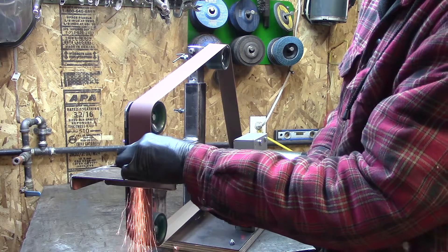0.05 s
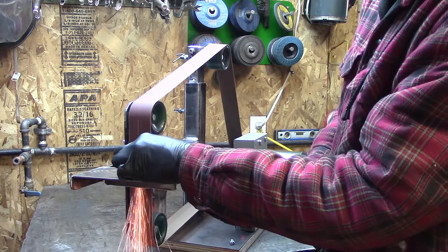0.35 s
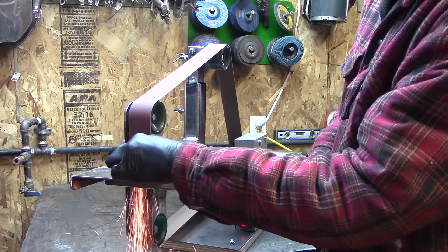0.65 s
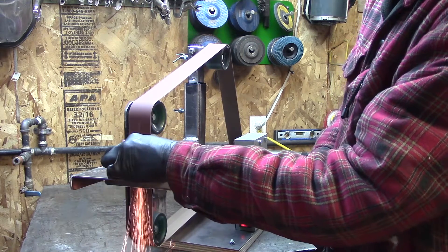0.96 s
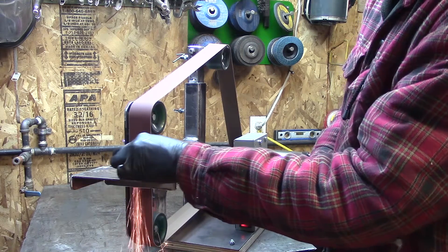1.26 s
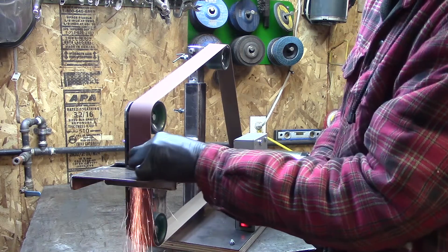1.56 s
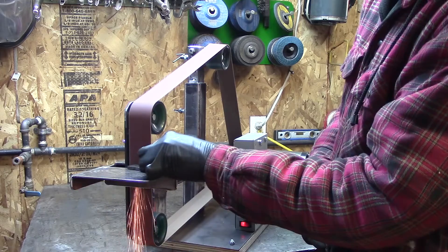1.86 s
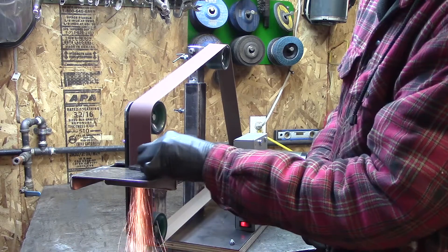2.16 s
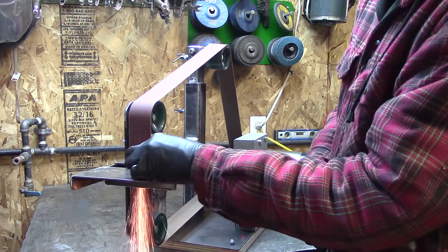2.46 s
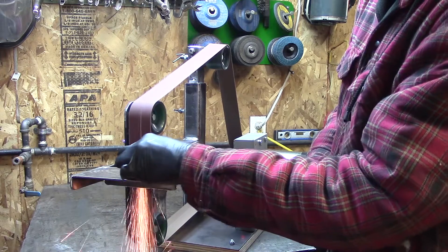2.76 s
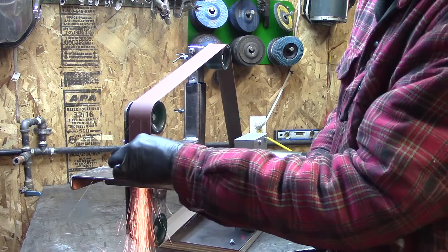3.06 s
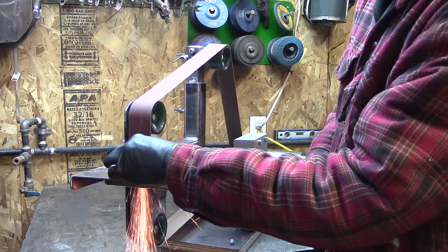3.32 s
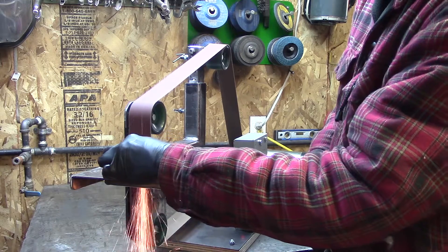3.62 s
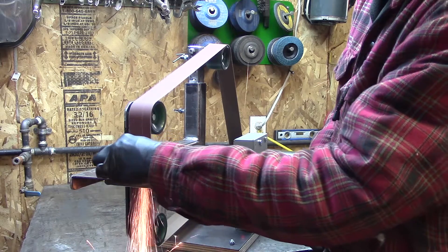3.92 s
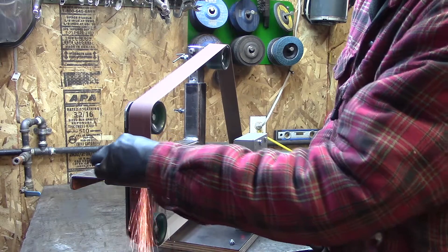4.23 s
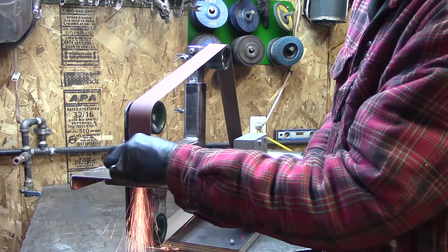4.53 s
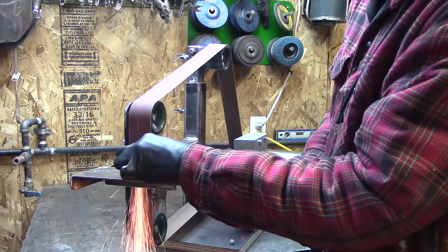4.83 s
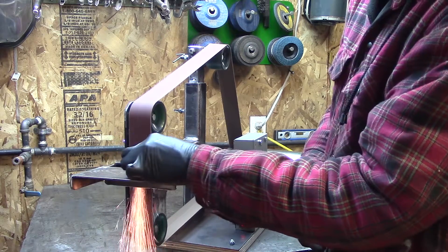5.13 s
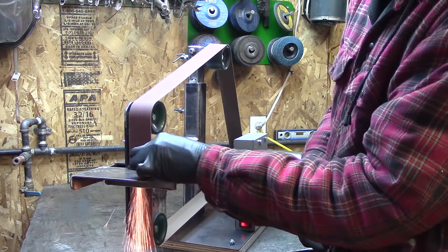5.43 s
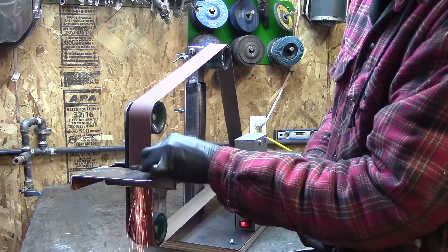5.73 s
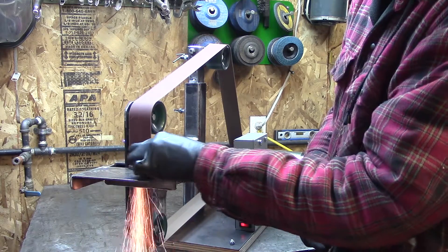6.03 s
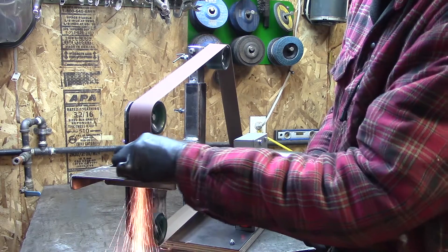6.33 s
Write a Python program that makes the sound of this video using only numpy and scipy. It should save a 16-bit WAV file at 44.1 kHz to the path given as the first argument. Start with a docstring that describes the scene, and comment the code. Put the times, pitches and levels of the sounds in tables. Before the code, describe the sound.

A belt grinder is already working on a piece of steel, heard close up in a small wood-lined workshop with little echo. The sound is a continuous bright rasp and hiss, pulsing slightly about twelve times a second, with thin metallic rings that swell and fade. A faint motor hum and the rush and drumming of the belt lie underneath. From about 1 to 2 seconds the grinding is a little lighter. At 2.1 seconds the steel digs in with a short, coarse scrape, starting a louder pass with a steadier high ring. Small fluttering chirps come as the belt catches between about 3.7 and 5.2 seconds. Around 5.5 seconds the pressure eases and a soft whine shows through. At 5.8 seconds the steel digs in again with more chirps, and the grinding carries on, swelling right at the end, near 6.6 seconds.

```python
"""Steel pressed against a belt grinder, heard close up on one microphone in a small wood-lined workshop.
The belt comes round about twelve times a second: its grit scrapes the steel and rings the platen and
tool rest, and the splice bumps by once a lap. Each push of the hand swells the rasp and makes the
wheels drone and sag a little. Behind it all sits the mains hum of the motor."""
import sys
import numpy as np
from scipy import signal
from scipy.fft import rfft, irfft, next_fast_len
from scipy.io import wavfile
from scipy.ndimage import uniform_filter1d

SR = 44100
rng = np.random.default_rng(int(sys.argv[2]) if len(sys.argv) > 2 else 0)


def wav_out(sig):
    """Save sig, one row per channel (or a flat mono array), as 16-bit PCM at SR to the path in sys.argv[1]."""
    wavfile.write(sys.argv[1], SR, np.round(np.clip(np.atleast_2d(sig).T, -1, 1) * 32767).astype(np.int16))


N = 290178
TIME = np.arange(N) / SR

TURNS_PER_S, TURNS_PER_LAP = 99.98, 8.112   # free speed of the small wheels; their turns per belt lap
# how each sound answers the hand: base gain/dB, dB per dB of pressure, dB per dB of bite
RASP_LAW, STEEL_LAW, SCRAPE_LAW = (-26.5, 0.37, .1), (-29, 0.95, -0.2), (-22, 0.16, 0.03)
RING_LAW, HISS_LAW, DRONE_LAW = (-26, 0.13, 0.15), (-22, .02, 0.2), (-46.5, 0, 0.67)

# pressure of the steel on the belt, lighter between passes: t/s, level/dB
HAND_PRESSURE = [(0, 1.1), (0.07, 1.5), (0.2, -1.6), (0.6, 0.03), (0.95, -2.0), (1.02, -6.0), (1.3, -2),
                 (2.05, -4.5), (2.12, 3), (3.8, 2), (4.15, 0.05), (4.6, -0.75), (4.73, 1.85), (5.25, 2),
                 (5.5, -4), (5.78, -3), (5.84, 2.5), (6.5, 0.5), (6.58, 8)]
# the hand nudges the steel in or eases it off: t/s, half length/s, level/dB
HAND_NUDGES = [(0.923, .03, 1), (1.04, .05, -1.5), (1.693, .05, -0.9), (2.06, .02, -1), (4.168, .02, -1.8),
               (5.61, .03, -.8), (4.86, 0.017, .6)]
# spells in which the belt catches on the steel: start/s, length/s, surge/dB, chirp/dB
BELT_CATCHES = [(1.3, .25, 0.5, -33), (3.743, .4, 1.5, -34), (4.218, .08, 3, -28), (4.863, .4, 2.5, -34),
                (5.842, .4, 1.5, -26.5)]
# the steel digs in at the start of a pass: start/s, length/s, level/dB
EDGE_DIGS = [(2.085, 0.24, -28), (5.79, 0.26, -30.5)]
# resonances that sing up as the contact slides: t/s, half length/s, f/Hz, width/Hz, level/dB
SINGING_MODES = [(0.12, .3, 4352, 18, -30), (0.15, .3, 4452, 18, -33), (0.4, .6, 2272, 44, -37),
                 (0.6, .14, 4452, 24, -29.5), (0.75, .3, 4352, 24, -33), (1.3, .04, 4445, 30, -29),
                 (1.48, .08, 4445, 24, -27), (2.18, .09, 4445, 30, -27.5), (2.36, .09, 4450, 30, -28.5),
                 (2.4, .16, 4685, 70, -29), (2.4, .25, 3740, 300, -30), (2.51, .035, 3740, 900, -24),
                 (3.3, .4, 4860, 130, -33), (3.3, .7, 1558, 30, -36.5), (3.5, .9, 2860, 70, -33),
                 (3.6, .7, 2615, 56, -35), (3.95, .06, 4780, 50, -30), (4.72, .05, 4690, 50, -27.5),
                 (4.75, .25, 4500, 50, -31), (5.0, .3, 1820, 34, -38.5), (5.1, .4, 1389, 18, -38),
                 (5.71, .04, 4450, 30, -29), (5.75, .25, 6135, 50, -36), (6.03, .06, 4450, 30, -26),
                 (6.18, .05, 4470, 50, -29), (6.4, .15, 4355, 24, -32)]

# resonances of the steel and the machine: f/Hz, width/Hz, relative level/dB
STEEL_MODES = [(1390, 30, -8), (1455, 45, -10), (1542, 35, -8), (1745, 35, -11), (1833, 40, -6),
               (1905, 30, -6), (2258, 28, -3), (2320, 35, -5), (2424, 24, -5)]
STEEL_MAIN_PAIR = [(2128, 38, 0), (2162, 40, -4)]   # the steel's strongest ring, two close modes
FRAME_MODES = [(2615, 50, -3), (2748, 30, -1), (2835, 35, -2), (3045, 50, -3), (3130, 45, -4),
               (3212, 45, -1), (3535, 35, -3), (3619, 26, 1.5), (3780, 35, -3), (3886, 28, -1)]   # platen and arm
TOOL_REST_MODES = [(4160, 30, -5), (4225, 30, -4), (4300, 22, -5), (4352, 20, 0), (4446, 20, 4),
                   (4495, 25, -5), (4580, 30, -5), (4678, 36, 1), (4780, 45, -2), (4925, 50, -5)]
STAND_MODES = [(300, 22, -4), (395, 25, -3), (505, 25, -7), (555, 30, -2), (660, 50, -3), (764, 20, -4),
               (1005, 45, -1), (1110, 24, 2), (1215, 26, 3), (1300, 30, 0)]
# narrow treble peaks that colour the grinding hiss: f/Hz, width/Hz, relative level/dB
HISS_PEAKS = [(5160, 35, -2), (5347, 45, -1), (5790, 50, 0), (6000, 55, -0.5), (6135, 38, 0.5),
              (6848, 70, -3), (7537, 40, -4), (8790, 60, -5), (9000, 80, -1), (9800, 55, -3),
              (9950, 55, -5), (10250, 160, -8), (11580, 200, -11), (13200, 70, -11), (14020, 80, -12)]

# broad spectra of the grit's noises: f/Hz, relative level/dB
RASP_SPECTRUM = [(200, -40), (500, -4.5), (1000, -3), (1400, -1), (1530, 0), (1640, -6), (1820, 3),
                 (1930, -2.5), (2030, -3.5), (2250, 1), (2450, -0.5), (3000, -7), (4000, -11), (7000, -50)]
SCRAPE_SPECTRUM = [(700, -62), (1500, -14.5), (2100, -13), (2600, -7), (3300, -4), (4000, -6), (4400, -5.5),
                   (5200, -18), (8000, -34)]
TOOL_REST_SPECTRUM = [(3000, -15), (3900, -11), (4250, 2), (4850, 6), (5200, -19), (6500, -26)]
HISS_SPECTRUM = [(3000, -14.5), (4800, 1), (5500, 3.5), (6500, 1.5), (7800, 0.5), (9000, -0.5),
                 (10300, -2.5), (12000, -5.5), (13800, -10), (15000, -25), (15700, -22)]
DIG_SPECTRUM = [(500, -36), (1000, 1.5), (1350, 0), (1800, 12), (2050, -8), (2600, -20), (5000, -45)]
BELT_RUSH_SPECTRUM = [(25, -39), (60, -29), (130, -25.5), (185, -26), (215, -9), (350, -14), (600, -10),
                      (700, -2), (860, -8.5), (1200, -0.5), (1700, -10.5), (3000, -15)]

# rise and fall of single sounds, apart from pressure: t/s, level/dB
SCRAPE_CURVE = [(0, 0), (1.9, -0.5), (2.5, 0.44), (3.5, -0.5), (4.2, -0.5), (4.9, 0), (5.5, -0.5),
                (6.58, 0.2)]
TOOL_REST_CURVE = [(0, 2.5), (0.15, 2.5), (0.85, 0.5), (1.46, 1), (1.65, 1.5), (2.1, 1), (2.42, -1.5),
                   (2.6, -1.2), (3.2, 0), (4.33, -4.5), (4.45, 1.5), (4.8, 2.5), (5.4, 0), (5.8, -1.5),
                   (6.05, 0), (6.58, 2)]
MAIN_RING_CURVE = [(0, -36), (0.7, -36), (1.1, -48), (1.33, -46), (1.45, -34), (1.6, -47), (2.02, -50),
                   (2.15, -36), (2.4, -29.5), (2.6, -27.5), (2.9, -30), (3.05, -28.5), (3.3, -32.5),
                   (3.6, -29.5), (4.2, -31), (4.45, -35.5), (4.7, -31.5), (5.1, -30), (5.3, -32),
                   (5.45, -40), (5.72, -47), (5.9, -31.5), (6.3, -34.5), (6.58, -30.5)]
DRUMMING_CURVE = [(0, -35), (0.06, -31), (0.18, -36), (0.5, -37), (0.65, -33), (1.1, -38), (1.4, -34),
                  (1.95, -35), (2.2, -33), (2.38, -35), (2.52, -31), (2.68, -35), (3.2, -36), (3.8, -34.5),
                  (4.05, -38), (4.25, -35), (4.85, -35), (4.96, -32), (5.55, -36), (6.1, -33),
                  (6.21, -29.5), (6.35, -34.5), (6.58, -35)]
WHINE_CURVE = [(0, -48), (0.8, -47), (1.1, -42), (1.35, -47), (2.15, -39.5), (2.37, -52), (2.6, -41),
               (3.05, -47.5), (4.3, -43.5), (4.95, -47), (5.15, -44), (5.48, -45), (5.62, -36.5),
               (5.76, -36), (5.9, -49), (6.25, -43), (6.58, -51)]

# ribs of the belt drumming on the platen: beats per lap, relative level/dB
RIB_TONES = [(72, -4.5), (73, -6.5), (74, -12), (76, -11)]
# clean overtones of the loaded belt: t/s, half length/s, beats per lap, level/dB
BELT_OVERTONES = [(2.5, 1.2, 90, -43), (3.35, .75, 360, -34), (3.6, .55, 160, -39), (5.05, .45, 97, -37),
                  (5.0, .45, 106, -44)]
# drone of the wheels: multiple of the wheel speed, relative level/dB
WHEEL_HARMONICS = [(1, -19.5), (2, -10.5), (3, 3), (4, 0.5)]
# hum of the motor: f/Hz, level/dB
MOTOR_HUM = [(120, -59), (220, -54.5), (240, -52.5), (260, -57), (320, -53)]


def grinding(laps, pressure, bite):
    """Grit tears at the steel: rasp, scrape and hiss, and the ringing of piece, frame and tool rest."""
    rest_db = curve(TOOL_REST_CURVE)
    surge_db, chirp_gain = catches()
    ring_db = rest_db + 0.57 * drift(16)
    rasp = from_db(-3) * coloured(grit(laps, repeat=0.19), RASP_SPECTRUM)
    piece = from_db(-2) * resonate(grit(laps, repeat=0.36), STEEL_MODES)
    scrape = from_db(-0.5) * coloured(grit(laps, repeat=0.17), SCRAPE_SPECTRUM)
    scrape += from_db(-5.5) * resonate(grit(laps, repeat=0.044), FRAME_MODES)
    scrape *= from_db(curve(SCRAPE_CURVE))
    ring = from_db(-5 + ring_db) * coloured(grit(laps, repeat=0.16), TOOL_REST_SPECTRUM)
    ring += from_db(-4.5 + 1.5 * ring_db) * resonate(grit(laps, repeat=0.088), TOOL_REST_MODES)
    hiss = coloured(grit(laps, repeat=0.36), HISS_SPECTRUM)
    hiss += from_db(-6) * resonate(grit(laps, repeat=0.14), HISS_PEAKS)
    hiss *= from_db(surge_db + 0.28 * rest_db) * hand_gain(HISS_LAW, pressure, bite)
    layers = [(RASP_LAW, rasp), (STEEL_LAW, piece), (SCRAPE_LAW, scrape), (RING_LAW, ring)]
    body = sum(hand_gain(law, pressure, bite) * layer for law, layer in layers)
    body *= from_db(0.34 * surge_db)   # a catch lifts the lower sounds less than the hiss
    force = cutting_force(laps)
    rings = singing() + chirp_gain * tuned(rng.standard_normal(N), hz=4830, width_hz=280)
    cut = force * (body + hiss + digging(laps))
    return low_cut(cut + rings, hz=260)   # so small a piece radiates no bass


def grit(laps, repeat):
    """Countless grain impacts: the share `repeat` of their power recurs each lap, the rest is new."""
    return np.sqrt(repeat) * on_belt(laps, count=3000) + np.sqrt(1 - repeat) * rng.standard_normal(N)


def hand_gain(law, pressure, bite):
    """Gain of a sound under the hand's pressure and bite."""
    base_db, per_pressure, per_bite = law
    return from_db(base_db + per_pressure * pressure + per_bite * bite)


def cutting_force(laps):
    """Quick changes of gain from the splice, worn patches, uneven grain and the unsteady hand."""
    laps_from_splice = (laps + .53) % 1 - .5
    splice_db = .95 * np.exp(-(laps_from_splice / .15) ** 2)
    surface_db = 0.03 * on_belt(laps, count=12) + 0.36 * on_belt(laps, count=48)
    tremble_db = 0.36 * drift(40)
    contact_db = splice_db + surface_db + tremble_db
    nudge_db = sum(db * bump(s, half_s) for s, half_s, db in HAND_NUDGES)
    return from_db(nudge_db + contact_db - contact_db.mean())


def catches():
    """In spells the belt catches every second lap: a surge (dB) and a slightly longer chirp (gain)."""
    surge_db, chirp_gain = np.zeros((2, N))
    for start_s, length_s, extra_db, chirp_db in BELT_CATCHES:
        for s in start_s + np.arange(0, length_s, 2 * TURNS_PER_LAP / TURNS_PER_S):
            surge_db += extra_db * bump(s, half_s=.016)
            chirp_gain += from_db(chirp_db) * bump(s, half_s=.048)
    return surge_db, chirp_gain


def singing():
    """The steel's main ring, and resonances that swell and fade as the contact point slides past."""
    rub = rng.standard_normal(N)
    pair = sum(from_db(db) * tuned(rng.standard_normal(N), hz, width_hz)
               for hz, width_hz, db in STEEL_MAIN_PAIR)
    rings = from_db(curve(MAIN_RING_CURVE)) * evened(pair)
    for s, half_s, hz, width_hz, db in SINGING_MODES:
        rings += from_db(db) * bump(s, half_s) * evened(tuned(rub, hz, width_hz))
    return rings


def digging(laps):
    """The coarse rasp while the steel's edge digs into the belt."""
    depth = sum(from_db(db) * ((TIME > s) & (TIME < s + length_s)) for s, length_s, db in EDGE_DIGS)
    return lagged(depth, seconds=0.025) * coloured(grit(laps, repeat=0.24), DIG_SPECTRUM)


def belt(laps, pressure):
    """The belt rushes over the wheels, shakes the hollow stand, drums on the platen and whines."""
    rush = from_db(-31.5 + 0.071 * pressure) * coloured(grit(laps, repeat=0.19), BELT_RUSH_SPECTRUM)
    stand = from_db(-38 + 0.19 * pressure) * resonate(grit(laps, repeat=0.13), STAND_MODES)
    ribs = sum(from_db(db + 3.1 * drift(6.8)) * wavering(beats * laps, radians=0.61, rate=15)
               for beats, db in RIB_TONES)
    platen = tuned(grit(laps, repeat=0.094), hz=902, width_hz=56)
    drumming = from_db(curve(DRUMMING_CURVE)) * evened(from_db(1.5) * ribs + from_db(-5) * platen)
    overtones = sum(from_db(db) * bump(s, half_s) * wavering(beats * laps, radians=0.4, rate=14)
                    for s, half_s, beats, db in BELT_OVERTONES)
    whine_phase = 2 * np.pi * 65 * laps + 0.35 * drift(12)   # 65 beats per lap
    whine = from_db(2.5 + curve(WHINE_CURVE)) * np.sin(whine_phase)
    frame = low_cut(stand + drumming, hz=220)   # these parts radiate little below their lowest modes
    return rush + frame + whine + overtones


def motor(turns, pressure, bite):
    """Wavering wheel harmonics, louder as the belt bites, over the motor's steady hum."""
    drone = sum(from_db(db + 3.1 * drift(18)) * wavering(k * turns, radians=0.38, rate=21)
                for k, db in WHEEL_HARMONICS)
    hum = sum(from_db(db + 0.74 * drift(4.2)) * np.sin(2 * np.pi * (hz * TIME + rng.random()))
              for hz, db in MOTOR_HUM)
    return hand_gain(DRONE_LAW, pressure, bite) * drone + hum


def workshop(x, t60_s=0.21):
    """Dense, quickly dying reflections reach the microphone from the near wooden walls."""
    t = TIME[:SR // 2]
    tail = rng.standard_normal(len(t)) * from_db(-60 * t / t60_s) * (t > .004)
    return signal.fftconvolve(x, tail / np.sqrt(np.sum(tail ** 2)))[:N]


def on_belt(laps, count):
    """A random pattern of `count` spots on the belt, coming round on every lap; rms 1."""
    spots = rng.standard_normal(count)
    loop = np.append(spots, spots[0]) - spots.mean()
    return rms_one(np.interp(laps % 1 * count, np.arange(count + 1), loop))


def coloured(x, spectrum):
    """Give x a broad spectrum; rms 1."""
    hz, db = np.transpose(spectrum)
    size = 2 * next_fast_len(N // 2 + 1)
    log_hz = np.log(np.fft.rfftfreq(size, 1 / SR) + 1)
    gain = from_db(np.interp(log_hz, np.log(hz), db))
    return rms_one(irfft(rfft(x, size) * gain, size)[:N])


def resonate(x, modes):
    """Parallel resonances with dark valleys between them; rms 1."""
    out = 0
    for hz, width_hz, db in modes:
        r = np.exp(-np.pi * width_hz / SR)
        poles = [1, -2 * r * np.cos(2 * np.pi * hz / SR), r * r]
        out = out + from_db(db) * signal.lfilter(np.array([1, 0, -1]) * (1 - r * r) / 2, poles, x)
    return rms_one(out)


def tuned(x, hz, width_hz):
    """One resonance with steep flanks, as from a pair of close modes; rms 1."""
    band_hz = [hz - width_hz / 2, hz + width_hz / 2]
    return rms_one(signal.sosfilt(signal.butter(2, band_hz, "band", fs=SR, output="sos"), x))


def low_cut(x, hz):
    """Roll off the bass below hz."""
    return signal.sosfilt(signal.butter(4, hz, "high", fs=SR, output="sos"), x)


def evened(x, window_s=.13):
    """Steady rubbing holds the slow level of a ring at rms 1, leaving its quick flutter."""
    return x / np.sqrt(uniform_filter1d(x ** 2, int(window_s * SR)) + 1e-9)


def wavering(cycles, radians, rate):
    """A tone whose phase wanders by about `radians`, `rate` times a second."""
    return np.sin(2 * np.pi * (cycles + rng.random()) + radians * drift(rate))


def drift(rate):
    """A random wander with `rate` new values a second; rms 1."""
    steps = rng.standard_normal(4096)
    return rms_one(np.interp(TIME * rate, np.arange(len(steps)), steps))


def lagged(x, seconds):
    """Follow x with a one-pole lag."""
    keep = np.exp(-1 / (seconds * SR))
    return signal.lfilter([1 - keep], [1, -keep], x)


def bump(middle_s, half_s):
    """A smooth swell of height 1."""
    return np.exp(-((TIME - middle_s) / half_s) ** 2)


def curve(points):
    """A level curve at every sample."""
    return np.interp(TIME, *np.transpose(points))


def from_db(db):
    """Decibels to gain."""
    return 10 ** (np.asarray(db) / 20)


def rms_one(x):
    """Scale to rms 1."""
    return x / np.sqrt(np.mean(x ** 2) + 1e-20)


def scene():
    """At the grinder, each push slows the wheels and belt. One close microphone feeds both channels."""
    pressure = curve(HAND_PRESSURE)
    bite = pressure - lagged(pressure, seconds=.3)   # a push bites until the cut settles
    sag_turns_per_s = .25 * lagged(bite, seconds=.08)   # the wheels' inertia makes them follow late
    turns = np.cumsum(TURNS_PER_S - sag_turns_per_s) / SR
    laps = turns / TURNS_PER_LAP
    steel = grinding(laps, pressure, bite)
    reflections = from_db(-12.5) * workshop(steel)
    sound = steel + reflections + belt(laps, pressure) + motor(turns, pressure, bite)
    return np.array([sound, sound])


def record(dry, cutoff_hz=15750):
    """The top of the microphone's signal is cut steeply."""
    return signal.sosfilt(signal.ellip(12, .1, 90, cutoff_hz, fs=SR, output="sos"), dry)


dry = scene()
out = record(dry)
wav_out(out)
```